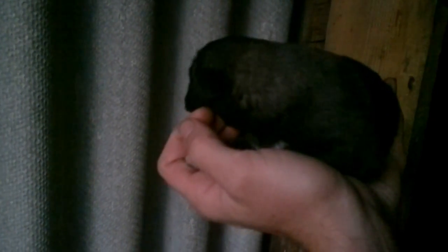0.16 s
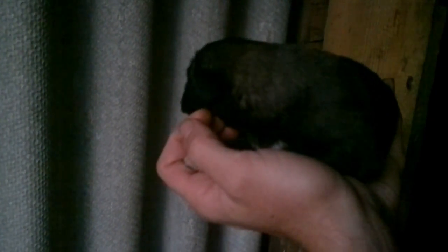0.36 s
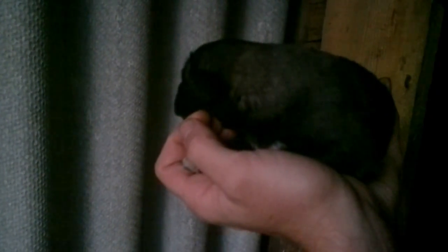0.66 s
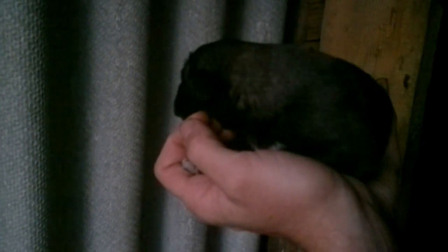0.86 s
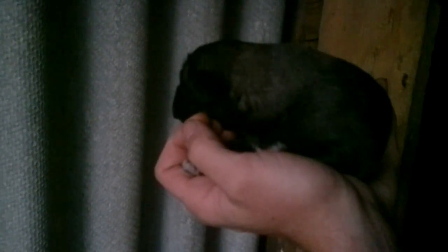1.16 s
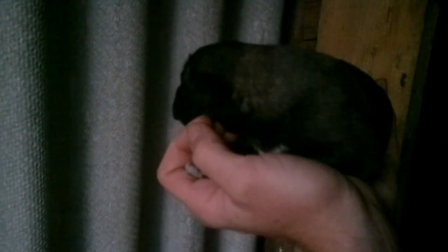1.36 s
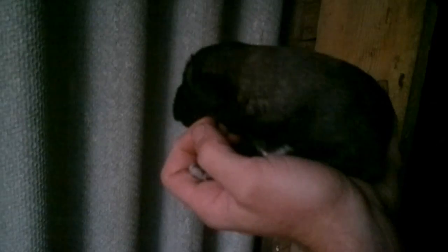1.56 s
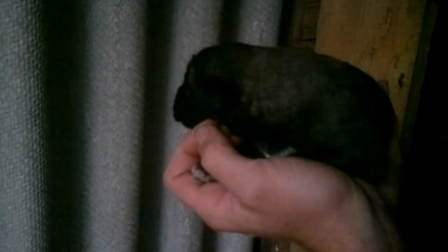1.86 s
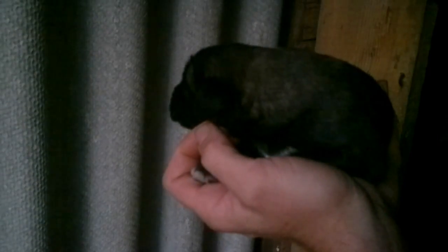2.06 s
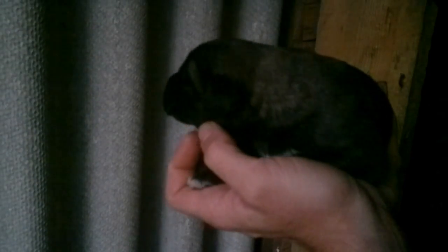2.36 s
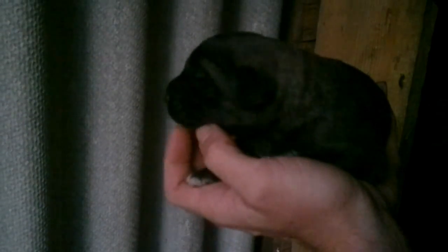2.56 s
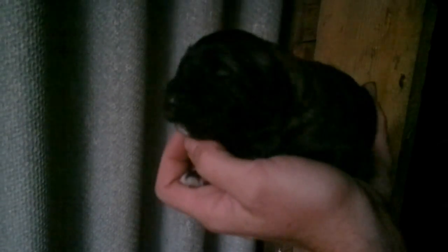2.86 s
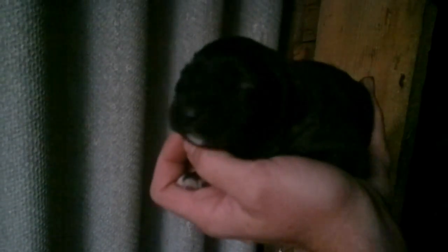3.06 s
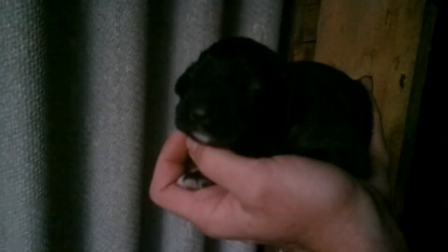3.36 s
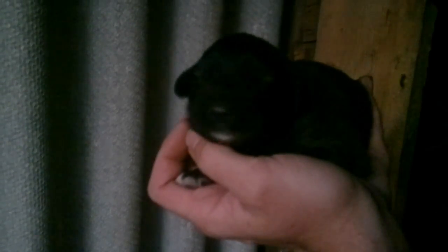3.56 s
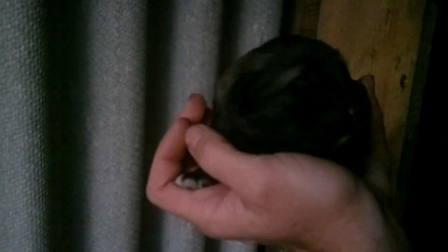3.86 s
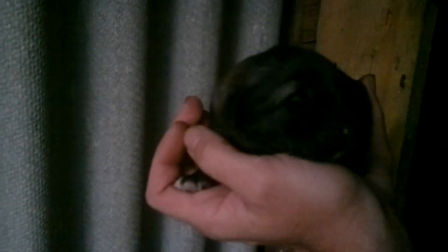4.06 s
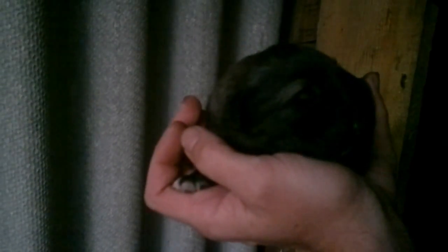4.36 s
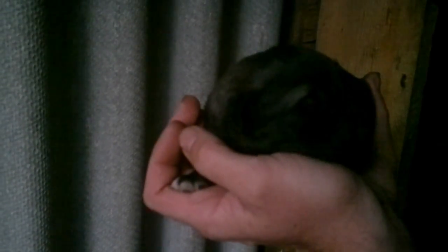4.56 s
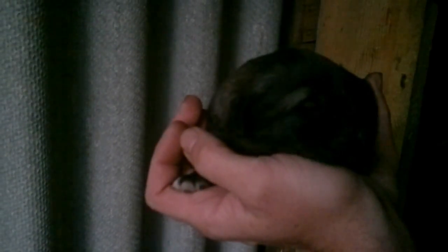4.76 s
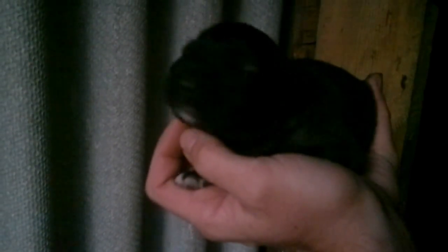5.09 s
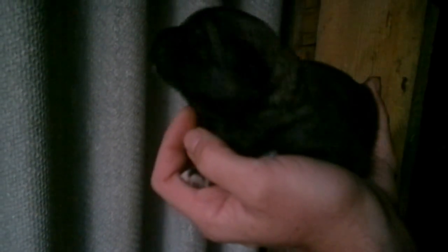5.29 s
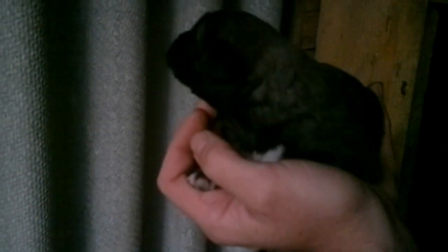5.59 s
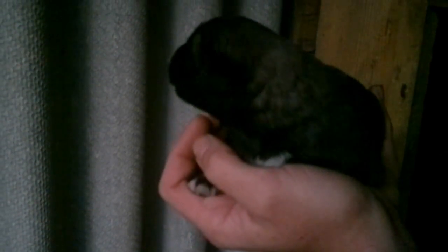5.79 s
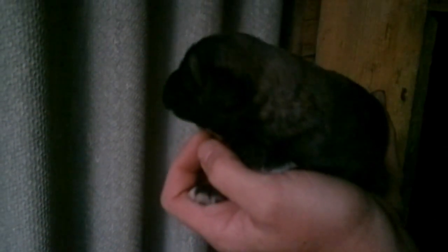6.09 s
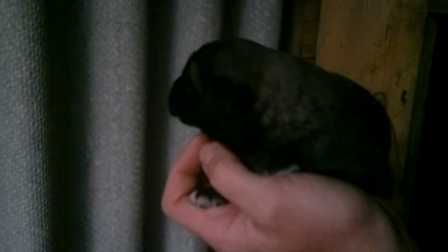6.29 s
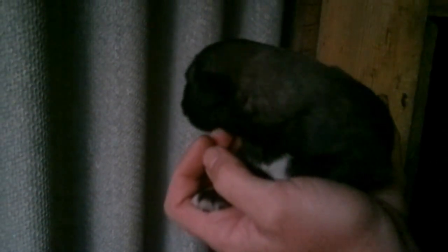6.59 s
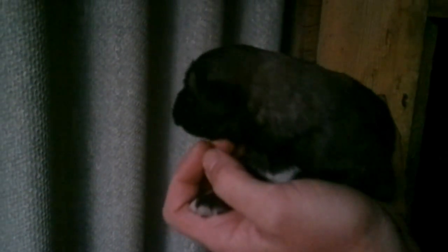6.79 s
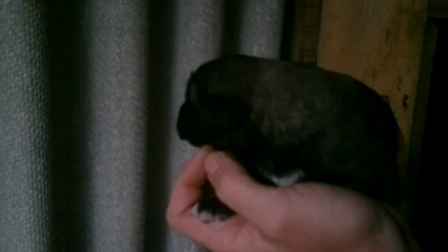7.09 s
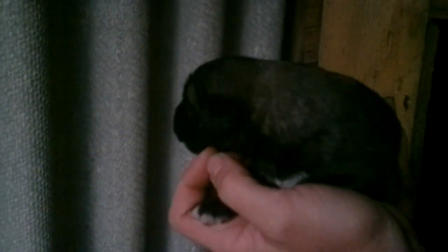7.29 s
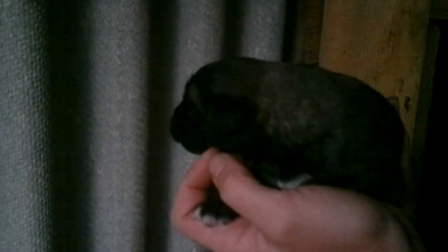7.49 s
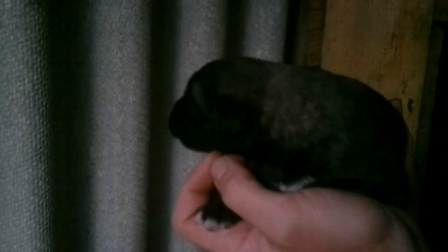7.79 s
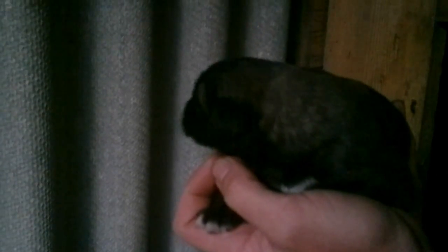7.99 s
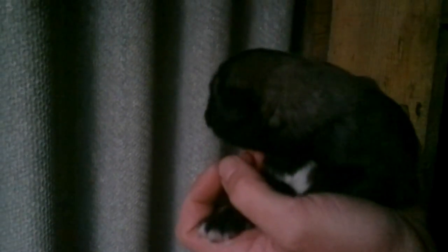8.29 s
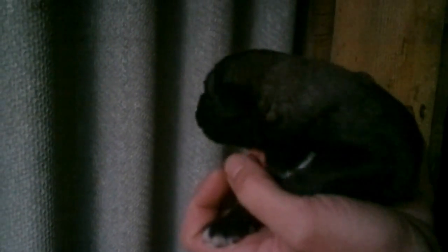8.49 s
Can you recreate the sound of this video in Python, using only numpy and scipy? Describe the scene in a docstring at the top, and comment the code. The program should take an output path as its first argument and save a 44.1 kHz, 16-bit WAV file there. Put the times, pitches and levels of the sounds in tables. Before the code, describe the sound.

Two tiny puppies squeal and whine over each other indoors, with soft bedding rustle, faint hiss and bassy wind-like rumbles swelling late.

```python
"""Two puppies whimpering in a small room

Two newborn puppies whimper and yelp over each other, the held one with the cleaner voice.
Each voice is a gliding stack of partials with noise of breath, echoed by feedback delays.
A draught rumbles on two microphone ports as gusts of low noise; bedding rustles in puffs of noise.
Faint room murmur and hiss, both shaped noise, sink under loud sound and recover.
"""
import sys
import numpy as np
from scipy import signal
from scipy.fft import rfft, irfft, next_fast_len
from scipy.io import wavfile
from scipy.ndimage import uniform_filter1d, minimum_filter1d

SR = 44100
rng = np.random.default_rng(int(sys.argv[2]) if len(sys.argv) > 2 else 0)


def waveform_to_disk(signal):
    """Save audio, clipped to [-1, 1], as 16-bit WAV at the path in sys.argv[1]."""
    frames = np.transpose(np.atleast_2d(signal))
    scaled = np.clip(frames, -1, 1) * 32767
    samples = np.round(scaled).astype(np.int16)
    wavfile.write(sys.argv[1], SR, samples)


def rack_gain(trim_db):
    """Turn a fader trim in dB into the linear factor to multiply a signal by."""
    fader = np.asarray(trim_db, float)
    return 10 ** (fader / 20)


N = 381465  # samples

# gusts on the ports: peak_s, level_db (before the doubling in draught), swell_s, die_away_s, left_minus_right_db
GUSTS = [(0.005, -29, 0.04, 0.04, -24), (0.53, -31.5, 0.1, 0.11, 4), (0.889, -29.5, 0.16, 0.043, 24),
         (1.131, -32, 0.044, 0.79, 13.5), (1.72, -37.5, .12, .15, 5.5), (2.021, -20, 0.19, 0.078, -17.5),
         (2.379, -29.5, 0.29, 0.078, -13), (2.53, -20.5, 0.13, 0.062, -23), (2.72, -35.5, .07, 0.088, -17),
         (3.369, -38, 0.054, 0.27, -12), (4.03, -10, .35, 0.25, -13.5), (4.31, -23, 0.29, 0.087, -13.5),
         (4.55, -30, 0.14, .3, -14), (4.84, -26.5, 0.082, 0.18, -7), (5.37, -27, 0.1, 0.64, -18.5),
         (5.68, -40, 0.29, .3, -18.5), (6.121, -22, 0.066, 0.23, -2), (6.77, -14, 0.29, 0.5, -13.5),
         (7.181, -12, 0.73, 0.12, -15), (7.52, -14, .1, 0.25, -10.5), (7.71, -9.5, 0.099, 0.15, -19.5),
         (8.0, -27.5, 0.23, .2, -10.5), (8.279, -21.5, 0.53, 0.52, -11.5)]
# spectrum of the draught: frequency_hz, density_db (relative, per Hz)
GUST_SPECTRUM = [(8.8, -51), (15, -7), (43, 5.5), (90, -5), (160, -16), (219, -21.5), (300, -31.5),
                 (390, -62), (660, -120)]
GUST_RANGE_DB = 25  # swell and die-away each span this range
CALM_DB = -56  # level between gusts, before the doubling in draught

# spectrum of the room murmur: frequency_hz, density_db (relative, per Hz)
MURMUR_SPECTRUM = [(110, -31), (180, -7.5), (299, -5.5), (420, 0), (495, -1), (851, -32), (1550, -42.5),
                   (2080, -25.5), (3000, -44.5), (3900, -60), (6600, -120)]
# spectrum of the air hiss, from 1 kHz up: frequency_hz, density_db (relative, per Hz)
HISS_SPECTRUM = [(1500, -12), (2600, 0.5), (3000, -13.5), (4500, -14), (6000, -18), (15000, -28)]
MURMUR_DB, HISS_DB = -50.5, -65.5  # rms before ducking
# correlation of the two sides in soft noise: frequency_hz, likeness (0 to 1)
LIKENESS = [(200, 0.9), (400, 1), (740, 0.81), (1400, 0.23), (2600, .02)]
# ducking of the faint background: threshold_db, share_of_excess, recovery_db_per_s
DUCKING = (-31, 0.49, 15)

# puffs of rustling bedding: full_level_s, length_s, level_db, sinking_db_per_s (negative swells)
PUFFS = [(0.454, .46, -49.5, 2.5), (0.932, 0.076, -40, -4.5), (1.307, 0.16, -42, -4),
         (1.8, 0.27, -36.5, -4), (2.361, 0.46, -37, 11), (4.404, 0.2, -39.5, 14), (5.22, .12, -41.5, 9),
         (7.175, .1, -45.5, 3), (7.604, 0.5, -38.5, 31)]
# spectrum of the bedding: frequency_hz, density_db (relative, per Hz)
BEDDING_SPECTRUM = [(150, -39.5), (280, -11.5), (600, -0.5), (800, -5), (1300, -14), (1650, -18),
                    (1850, -26.5), (2600, -31), (3200, -61)]
PUFF_ATTACK_S, PUFF_RELEASE_DB_PER_S = 0.011, 450.5
STILL_DB = -58  # rustle between puffs

# calls of the held puppy, one list per breath: time_s, pitch_hz, loudest_partial_db,
# mouth_resonance (multiple of the pitch, held within 1 to 3), squeak_db (level above about 3 kHz)
HELD_CALLS = [
    [(2.35, 275.9, -45, 2.4, -76), (2.53, 331, -33.5, 2.9, -72.5), (2.6, 300.4, -35, 2.6, -47.5),
     (2.79, 333.3, -31, 3.0, -85), (2.834, 383.3, -25.5, 2.4, -70.5), (2.884, 601.8, -12.5, 1.6, -68),
     (2.93, 822.3, -10.5, 1.3, -53.5), (2.97, 942, -5.5, 1.05, -35.5), (3.008, 831.5, -18, 1.6, -47.5),
     (3.082, 487.8, -14.5, 2.05, -51.5), (3.13, 395.8, -25.5, 2.6, -60.5), (3.23, 275.8, -33.5, 2.9, -80)],
    [(3.66, 284.7, -34.5, 2.4, -87.5), (3.724, 399.8, -24, 2.7, -72), (3.768, 552, -14, 3.0, -26.5),
     (3.82, 673, -19.5, 2.8, -29), (3.858, 635.6, -23.5, 2.3, -39.5), (3.98, 305.8, -31, 2.4, -64)],
    [(4.385, 285, -49.5, 2.3, -91), (4.423, 328, -36, 3.0, -83), (4.477, 348.7, -29, 3.0, -61),
     (4.505, 319.5, -35, 3.0, -55.5), (4.563, 306, -34, 3.0, -61.5), (4.62, 283, -48, 3.0, -98)],
    [(4.925, 328.4, -33, 1.9, -88.5), (4.965, 574.3, -21, 2.5, -50.5), (4.999, 746.4, -16, 3.0, -15),
     (5.025, 820.6, -11, 2.6, -22.5), (5.07, 857.6, -14, 2.2, -31.5), (5.09, 752.4, -28.5, 2.3, -39.5),
     (5.14, 471, -32, 2.7, -48.5), (5.199, 314, -37.5, 3.0, -63.5), (5.27, 294.8, -44, 2.7, -100)],
    [(5.775, 340.2, -41.5, 3.0, -87), (5.811, 486, -28, 2.1, -90), (5.841, 627, -20, 2.7, -43),
     (5.9, 631, -22, 2.8, -39), (5.975, 420, -32.5, 2.4, -56), (6.043, 350, -31, 2.6, -94),
     (6.161, 307.4, -33.5, 2.9, -81), (6.23, 303, -43.5, 2.4, -96)],
    [(6.53, 290, -40, 2.7, -99), (6.586, 526.4, -24, 2.3, -55.5), (6.626, 631, -19, 2.1, -56),
     (6.654, 633.3, -20, 2.7, -41.5), (6.702, 622, -20.5, 2.4, -42.5), (6.815, 395.3, -29.5, 2.5, -54),
     (6.84, 370.7, -26.5, 2.6, -78), (6.92, 355, -33.5, 2.7, -77.5), (6.982, 323.7, -33.5, 2.8, -86),
     (7.015, 243, -40.5, 1.4, -93)],
    [(7.13, 489.5, -44.5, 1.6, -105), (7.18, 596, -42, 2.1, -105), (7.226, 476, -40.5, 2.3, -96.5),
     (7.28, 354, -46, 3.0, -88)],
    [(7.285, 349.6, -40.5, 2.7, -88), (7.325, 572, -28, 2.1, -74.5), (7.348, 720, -19, 2.9, -45),
     (7.375, 762, -15.5, 3.0, -28.5), (7.425, 758, -25.5, 2.7, -42.5), (7.459, 710, -27.5, 2.0, -44),
     (7.553, 410.3, -30.5, 2.7, -57.5)],
    [(7.553, 391.2, -40, 2.7, -79), (7.615, 391.2, -37.5, 2.8, -86.5), (7.769, 520, -29, 2.7, -46.5),
     (7.845, 451, -34, 2.2, -62), (7.887, 369.5, -35, 2.3, -98), (7.931, 370.6, -32.5, 2.5, -100),
     (8.0, 284.6, -43, 2.6, -110), (8.1, 275, -47.5, 2.8, -110), (8.2, 255, -57, 2.4, -110)],
    [(8.33, 421, -60, 1.2, -110), (8.36, 645, -30, 1.7, -100), (8.39, 959, -23, 1.9, -52.5),
     (8.41, 1046, -17.5, 2.05, -28.5), (8.456, 1169, -16.5, 2.05, -27.5), (8.52, 1034, -32.5, 1.85, -54),
     (8.564, 751, -30, 1.9, -54.5), (8.65, 466, -30, 2.9, -50)],
]
# calls of the other puppy: time_s, pitch_hz, loudest_partial_db, mouth_resonance (multiple), squeak_db
OTHER_CALLS = [
    [(0.19, 478, -73, 1.7, -81), (0.232, 897.6, -34, 1.52, -71), (0.26, 1068, -24.5, 1.6, -27),
     (0.3, 941, -30, 2.6, -35), (0.36, 676, -30, 2.5, -39.5), (0.528, 639.2, -37, 2.37, -44),
     (0.548, 660, -41, 2.5, -54.5), (0.562, 830, -32.5, 1.46, -48), (0.68, 559, -31.5, 1.85, -59.5),
     (0.74, 577, -30.5, 2.25, -82), (0.792, 496.5, -31.5, 2.3, -76), (0.89, 417, -56, 2.73, -74)],
    [(1.19, 591.4, -58, 1.8, -70), (1.244, 1091, -19.5, 1.15, -69), (1.262, 1071, -19.5, 1.53, -34.5),
     (1.326, 961, -31, 1.82, -29), (1.36, 900, -33, 1.8, -34), (1.405, 935, -33.5, 1.7, -33),
     (1.43, 1046, -23.5, 1.7, -38.5), (1.46, 1075, -24, 1.5, -39.5), (1.52, 1010, -28, 1.8, -39.5),
     (1.58, 1062, -26.5, 1.45, -42.5), (1.644, 761, -33.5, 2.5, -45), (1.756, 879, -30, 2, -34),
     (1.912, 702, -41, 1.77, -57), (1.96, 461, -35.5, 2.53, -97.5), (2.0, 470, -48, 2.7, -62.5)],
    [(2.47, 854, -40, 1.7, -72), (2.525, 1072, -18.5, 0.51, -63), (2.558, 939.6, -22.5, 2.85, -32),
     (2.686, 456, -33, 2.6, -56.5), (2.78, 539, -35.5, 2.36, -67.5), (2.83, 490, -40.5, 3, -65)],
    [(3.08, 838.5, -26, 1.2, -63.5), (3.13, 919, -29, 1.43, -60.5), (3.192, 839, -35, 1.4, -59),
     (3.26, 1083, -32, 1.35, -79), (3.335, 778, -34, 1.46, -73), (3.37, 720, -38, 2.7, -73),
     (3.43, 478, -48.5, 1.85, -82)],
    [(3.62, 452, -55.5, 1.64, -90), (3.658, 533, -30.5, 1.68, -72), (3.696, 706.5, -28, 1.2, -78),
     (3.786, 1190, -25.5, 1.8, -22), (3.84, 1060, -25, 1.85, -47.5), (3.89, 1079, -29.5, 1.14, -49)],
    [(3.95, 558.5, -39.5, 1.87, -59), (4.042, 780, -37.5, 1.72, -72.5), (4.13, 835, -36, 1.64, -90),
     (4.166, 691.4, -40.5, 1.84, -77.5), (4.36, 564, -37.5, 1.72, -100), (4.446, 808.5, -41, 1.6, -72),
     (4.478, 854, -37, 1.7, -72), (4.514, 764, -34, 1.4, -74), (4.69, 655, -37.5, 1.49, -92),
     (4.784, 403.7, -40.5, 2.28, -84), (4.838, 374.5, -36.5, 2.2, -86), (4.88, 377, -56, 2.3, -94)],
    [(5.27, 850, -38, 1.54, -104), (5.308, 944, -43.5, 1.35, -92.5), (5.366, 771, -32.5, 1, -105),
     (5.432, 471, -39, 1.9, -105)],
    [(5.432, 471, -41.5, 1.45, -105), (5.516, 409, -44, 2.15, -100), (5.62, 462, -44, 1.7, -105),
     (5.78, 476.7, -42.5, 2, -78.5), (5.924, 500, -40, 2.47, -57), (6.036, 511.2, -34.5, 2.1, -77),
     (6.098, 522, -36, 2.04, -91), (6.406, 453.3, -44, 2.5, -80), (6.57, 387, -48, 2.64, -74.5)],
    [(7.57, 395.4, -48, 2.4, -79), (7.602, 496, -39, 2, -68), (7.658, 634, -32.5, 1.5, -77),
     (7.73, 889, -32.5, 1.15, -57), (7.772, 846, -39, 2.63, -51), (7.854, 650, -31.5, 1.73, -61),
     (7.9, 394, -43, 2.6, -100)],
]
# throat colour of the held puppy's high partials: frequency_hz, gain_db
HELD_THROAT = [(2700, 3), (3100, -8), (3550, -10), (4000, 5.5), (4500, -3), (5100, -14.5), (5700, -21),
               (7000, -31.5), (8500, -32.5), (10500, -27), (12000, -29.5), (13500, -45.5)]
# throat colour of the other puppy's high partials: frequency_hz, gain_db
OTHER_THROAT = [(2700, 1), (3150, 0.5), (3700, -1), (4500, 1.5), (5200, -7), (5800, -24.5), (7000, -24.5),
                (8500, -26.5), (10300, -34.5), (11500, -56.5)]
# trembling of the first low whimper: start_s, end_s, rate_per_s, depth_share (of pitch, scaled for each voice)
TREMBLE = (2, 2.8, 22, 0.045)
# harsh scream in the last yelp: start_s, end_s, extra_hoarseness_db, strong_weak_share, chaotic_share
SCREAM = (8.385, 8.49, 17, .6, 0.76)

# slopes of the low partials on either side of the mouth resonance
BELOW_MOUTH_DB_PER_OCT, ABOVE_MOUTH_DB_PER_OCT = 3.5, 35.5
# a wide mouth (strong squeak) thins the lowest partials: dB per octave for each dB of squeak
WIDE_FROM_DB, WIDE_THINNING = -40, 0.4
# a half-shut mouth turns squeak to air: loudest partial over squeak, share of the excess
BREATHY_FROM_DB, BREATHY_SHARE = 22, 0.55
# it also muffles partials above this frequency: share of the breathiness per octave
MUFFLED_FROM_HZ, MUFFLED_SHARE = 1850, 0.99
SAG_HOARSE_DB_PER_OCT_S = 1.44  # a sagging pitch goes hoarse

# level of the voices at the two sides: frequency_hz, left_minus_right_db
SIDE_LEVEL = [(260, -1), (700, 0.5), (1130, -2), (1850, -5.5), (3000, -4), (4900, 10), (6500, 0.5),
              (9000, -12)]
# phase of the voices at the two sides: frequency_hz, left_lead_rad
SIDE_LEAD = [(100, 0.5), (700, 0.2), (1150, -1), (1400, 0.74), (1900, 1.7), (2800, 1.77), (3400, -1.1),
             (4100, 1.8), (5000, 2.3)]
ROOM_T60_S, ROOM_GAIN_DB = 0.16, -13.5  # decay time in the bass; the treble dies sooner
WALL_CUT_HZ = 4500  # low-pass corner of each round trip

LIMIT, LIMIT_HOLD_S = 0.9, 0.008


def rms_one(x):
    """Normalisation: scale to unit root mean square."""
    return x / np.sqrt(np.mean(x ** 2) + 1e-20)


def at_hz(points, hz):
    """Interpolation on a logarithmic frequency axis."""
    table_hz, values = np.array(points).T
    return np.interp(np.log(np.maximum(hz, 1)), np.log(table_hz), values)


def drift(rate_hz, size):
    """Low-pass random process of unit spread: white noise through two equal one-pole filters."""
    r = np.exp(-2 * np.pi * rate_hz / SR)
    settle = 8000  # samples dropped while the filter settles
    noise = rng.standard_normal(size + settle)
    return rms_one(signal.lfilter([1], [1, -2 * r, r * r], noise)[settle:])


def coloured(x, db, radians=0):
    """Linear filtering: multiply the spectrum by a gain and a phase."""
    return irfft(rfft(x) * rack_gain(db) * np.exp(1j * radians), N)


def soft_noise(spectrum, hz):
    """Partial coherence: mid and side noise mixed so that the two sides are alike mainly in the lows."""
    alike = np.clip(at_hz(LIKENESS, hz), 0, 1)
    mid, side = rfft(rng.standard_normal((2, N)))
    both = np.sqrt(1 + alike) * mid + np.sqrt(1 - alike) * side * [[1], [-1]]
    return rms_one(irfft(rack_gain(at_hz(spectrum, hz)) * both, N))


def draught(hz, lumpy_db):
    """Turbulence: lumpy low noise, unrelated on the two ports; gusts swell and die evenly in dB."""
    t = np.arange(N) / SR
    power = rack_gain(2 * CALM_DB) / 2
    for peak_s, db, swell_s, die_s, pan_db in GUSTS:
        left = 1 / (1 + rack_gain(-2 * pan_db))  # power share of the left port
        away = np.maximum((peak_s - t) / swell_s, (t - peak_s) / die_s)
        power = power + rack_gain(2 * (db - GUST_RANGE_DB * away)) * [[left], [1 - left]]
    ports = []
    for port_power in power:
        lumps = rack_gain(lumpy_db * drift(16.0, N))
        turbulence = coloured(rng.standard_normal(N) * lumps, at_hz(GUST_SPECTRUM, hz))
        ports.append(2 * np.sqrt(port_power) * rms_one(turbulence))
    return np.array(ports)


def murmur(hz):
    """Diffuse room tone: partially coherent noise strongest in the low mids."""
    return rack_gain(MURMUR_DB) * soft_noise(MURMUR_SPECTRUM, hz)


def hiss(hz):
    """Incoherent noise: a faint hiss, independent on each side."""
    spectrum_db = at_hz(HISS_SPECTRUM, hz) - 60 * (hz < 1000)
    return rack_gain(HISS_DB) * rms_one(coloured(rng.standard_normal((2, N)), spectrum_db))


def rustle(hz, patchy_db):
    """Friction noise: patchy puffs of bedding with a quick attack, a slope and a steep release."""
    t = np.arange(N) / SR
    level = rack_gain(STILL_DB)
    for full_s, length_s, db, sink_db in PUFFS:
        since = t - full_s
        fall_db = sink_db * np.clip(since, 0, length_s)
        fall_db = fall_db + PUFF_RELEASE_DB_PER_S * np.maximum(since - length_s, 0)
        level = level + rack_gain(db - fall_db) * np.clip(1 + since / PUFF_ATTACK_S, 0, 1)
    patches = rack_gain(patchy_db * drift(33, N))
    return level * patches * soft_noise(BEDDING_SPECTRUM, hz)


def mouth_colour(mouth, squeak):
    """Resonance: levels of the first three partials around that of the mouth, the loudest at 0 dB."""
    octaves = np.log2(np.arange(1, 4)[:, None] / np.clip(mouth, 1, 3))
    below = BELOW_MOUTH_DB_PER_OCT + WIDE_THINNING * np.clip(squeak - WIDE_FROM_DB, 0, 16)
    db = np.minimum(below * octaves, -ABOVE_MOUTH_DB_PER_OCT * octaves)
    return db - db.max(axis=0)


def call(rows, throat, air, top_hz, air_db, trembles, jitter, waver, shimmer_db, hoarse_db, roll_db, edge_s):
    """Source and filter: one breath of wavering partials, each with a hoarse skirt, and pulsed air."""
    s, *columns = np.transpose(rows)
    first = round(s[0] * SR)
    t = np.arange(first, min(round(s[-1] * SR), N)) / SR
    size = len(t)
    pitch, level, mouth, squeak = [uniform_filter1d(np.interp(t, s, c), size=650) for c in columns]
    sag = np.clip(-np.gradient(np.log2(pitch)) * SR, 0, 8)  # octaves per s
    breathy_db = BREATHY_SHARE * np.clip(level - squeak - BREATHY_FROM_DB, 0, 24)

    start, end, per_s, depth = TREMBLE
    tremble = trembles * depth * np.sin(2 * np.pi * per_s * (t - start)) * (t > start) * (t < end)
    pitch = pitch * (1 + tremble + jitter * drift(68, size) + waver * drift(13, size))
    phase = 2 * np.pi * np.cumsum(pitch) / SR

    start, end, extra_db, halving, chaos = SCREAM
    scream = np.clip(np.minimum(t - start, end - t) / 0.035, 0, 1)
    hoarse_db = hoarse_db + extra_db * scream + SAG_HOARSE_DB_PER_OCT_S * sag
    effort = level + 17.5  # dB above a firm yelp
    lowest = level + mouth_colour(mouth, squeak)

    body, top = air[:, first:][:, :size]
    breath = body + rack_gain(1.2 * effort + 4.5) * top
    out = rack_gain(squeak + air_db + breathy_db) * breath * (1 + np.cos(phase))  # a puff each cycle
    squeak = squeak - breathy_db - 10 * np.log10(2500 / pitch)  # the band is shared among its partials
    for k in range(1, int(15000 / pitch.max()) + 4):
        hz = k * pitch
        high = np.clip((hz - 2500) / 400, 0, 1) * (k > 1)
        low_db = lowest[min(k, 3) - 1] - roll_db * np.log2(max(k / 3, 1))
        low_db = low_db - MUFFLED_SHARE * breathy_db * np.log2(np.maximum(hz / MUFFLED_FROM_HZ, 1))
        db = (1 - high) * low_db + high * (squeak + at_hz(throat, hz))
        db = db + 0.52 * effort * np.clip((hz - top_hz) / 1500, 0, 1)  # a pressed voice reaches the top
        db = db + shimmer_db * drift(44, size)
        db = db + 5.6 * high * drift(5.1, size)  # high partials swell and break up one by one
        hoarse = rack_gain(hoarse_db) * min(k, 7.5) * drift(200, size)  # the higher, the rougher
        out = out + rack_gain(db) * (np.sin(k * phase) + hoarse * np.cos(k * phase))

    # strong-weak cycles give lines at half the pitch, uneven ones a rasp
    out = out * (1 + scream * (halving * np.cos(phase / 2) + chaos * drift(280, size)))
    edges = np.clip(np.minimum(t - s[0], s[-1] - t) / edge_s, 0, 1)
    voice = np.zeros(N)
    voice[first:][:size] = np.sqrt(2) * out * edges
    return voice


def puppy(calls, throat, top_hz, **voice):
    """Vocal tract filtering: throat-coloured air, split into body and top, feeds all calls of one animal."""
    hz = np.arange(N // 2 + 1) * SR / N
    air = rms_one(coloured(rng.standard_normal(N), at_hz(throat, hz) - 40 * (hz < 2300)))
    top = coloured(air, -60 * np.clip((top_hz + 1500 - hz) / 1500, 0, 1) ** 2)
    air_bands = np.array([air - top, top])
    return sum(call(rows, throat, air_bands, top_hz, **voice) for rows in calls)


def puppies():
    """Superposition: both dry voices added, the held one less hoarse and steadier in pitch."""
    held = puppy(HELD_CALLS, HELD_THROAT, top_hz=4600, air_db=-16.5, trembles=0.95, jitter=0.0048,
                 waver=0.006, shimmer_db=3.0, hoarse_db=-35.5, roll_db=23.5, edge_s=0.007)
    other = puppy(OTHER_CALLS, OTHER_THROAT, top_hz=6100, air_db=-14.0, trembles=0, jitter=0.009,
                  waver=0.011, shimmer_db=3.0, hoarse_db=-26, roll_db=8.5, edge_s=0.0092)
    return held + other


def two_sides(voices, hz):
    """Interaural difference: level and phase split evenly between left and right at each frequency."""
    level_db, lead = at_hz(SIDE_LEVEL, hz), at_hz(SIDE_LEAD, hz)
    return np.array([coloured(voices, side * level_db / 2, side * lead / 2) for side in (1, -1)])


def room(x):
    """Reverberation: twenty feedback delays a side, duller on every round."""
    size = next_fast_len(N + SR // 2)
    w = 2 * np.pi * np.arange(size // 2 + 1) / size
    hz = w * SR / (2 * np.pi)
    dull = 1 / np.sqrt(1 + (hz / WALL_CUT_HZ) ** 2)
    wet = np.zeros((2, len(w)), complex)
    for k, lag_s in enumerate(np.geomspace(0.011, 0.037, num=40)):
        loop = rack_gain(-60 * lag_s / ROOM_T60_S) * dull * np.exp(-1j * w * round(lag_s * SR))
        wet[k % 2] += loop / (1 - loop) * (-1) ** (k // 2)
    narrow = 1 / (1 + (hz / 1100) ** 4)  # long waves reach both ports alike
    wet = (1 - narrow) * wet + narrow * wet.mean(axis=0)
    return irfft(wet * rfft(x, size), size)[:, :N]


def ducking(loud):
    """Gain control: the background sinks under loud sound and recovers at a constant rate in dB."""
    from_db, share, recovery_db = DUCKING
    power = uniform_filter1d(np.mean(loud ** 2, axis=0), size=1300)
    level = 10 * np.log10(power + 1e-12)
    climb = recovery_db * np.arange(N) / SR
    cut_db = np.maximum.accumulate(share * np.maximum(level - from_db, 0) + climb) - climb
    return rack_gain(-uniform_filter1d(cut_db, size=600))


def scene():
    """Superposition: voices, room, draught and rustle over the ducked murmur and hiss."""
    hz = np.arange(N // 2 + 1) * SR / N
    voices = puppies()
    loud = two_sides(voices, hz) + rack_gain(ROOM_GAIN_DB) * room(voices) + draught(hz, lumpy_db=4.5)
    background = murmur(hz) + hiss(hz)
    return loud + rustle(hz, patchy_db=2.0) + ducking(loud) * background


def top_cut(x):
    """Nothing passes above the cut-off."""
    return signal.sosfilt(signal.butter(12, 15700, fs=SR, output="sos"), x)


def record(dry):
    """Look-ahead limiting: the gain eases down around peaks above the limit."""
    size = round(LIMIT_HOLD_S * SR)
    peak = np.abs(dry).max(axis=0)
    gain = minimum_filter1d(LIMIT / np.maximum(peak, LIMIT), size=2 * size)
    mix = dry * uniform_filter1d(gain, size=size)
    return top_cut(mix)


dry = scene()
out = record(dry)
waveform_to_disk(out)
```